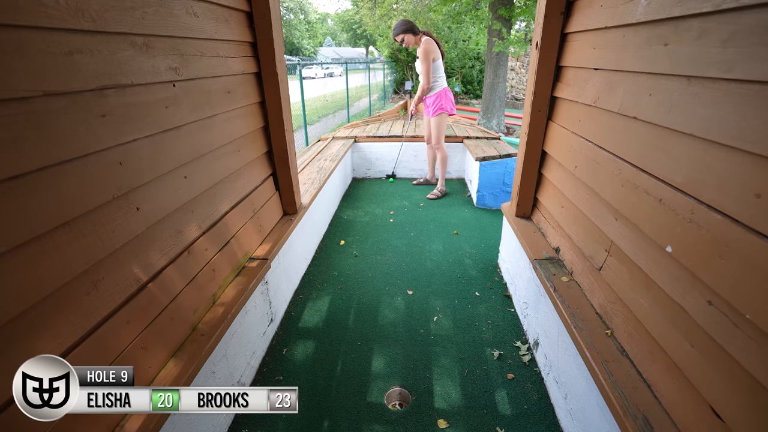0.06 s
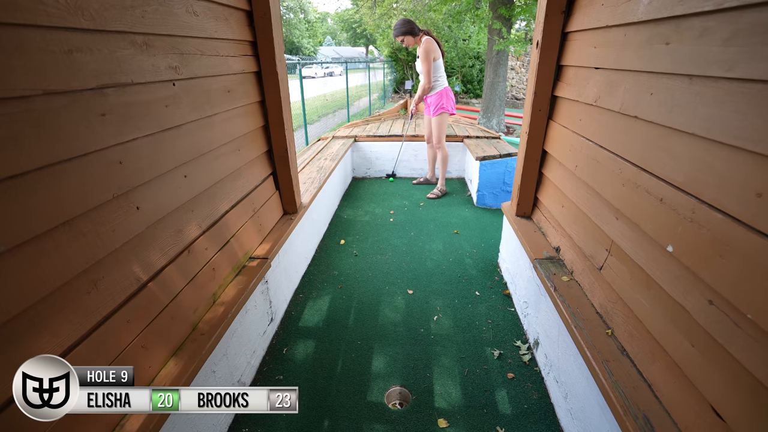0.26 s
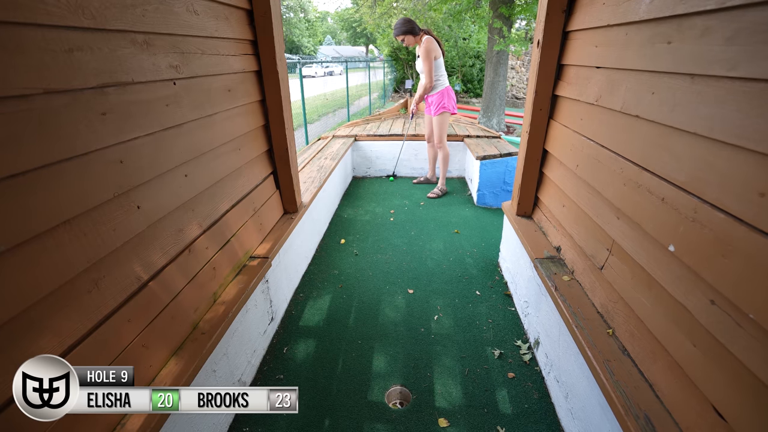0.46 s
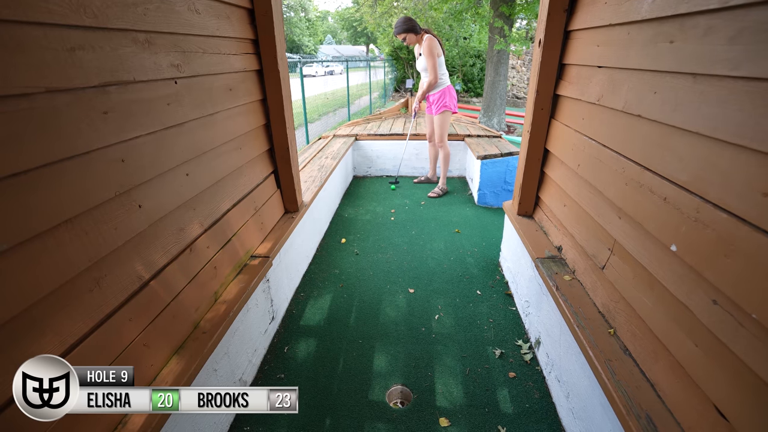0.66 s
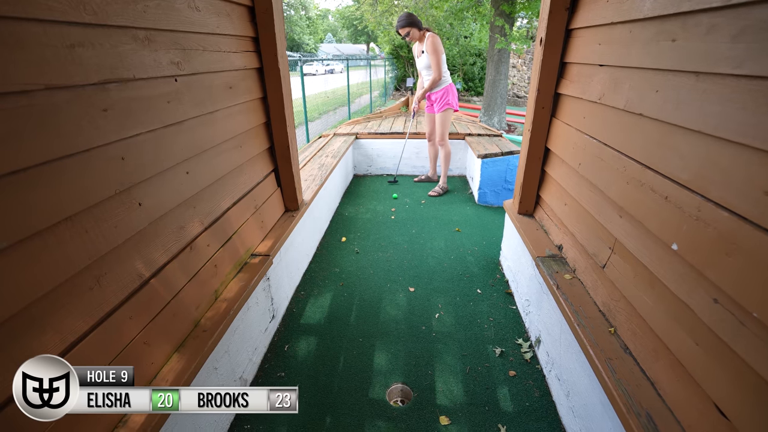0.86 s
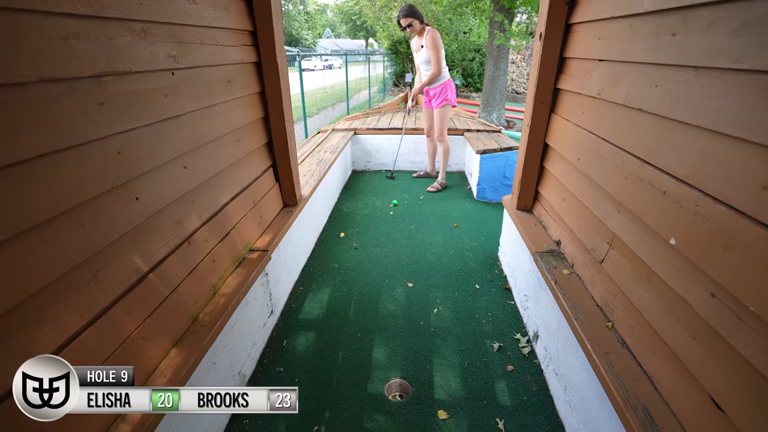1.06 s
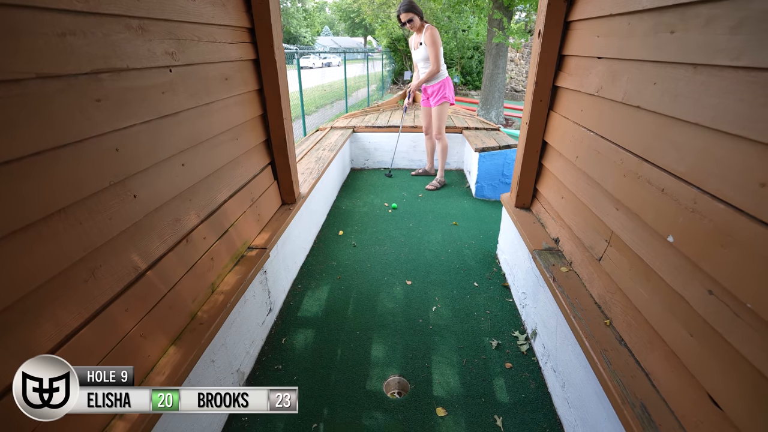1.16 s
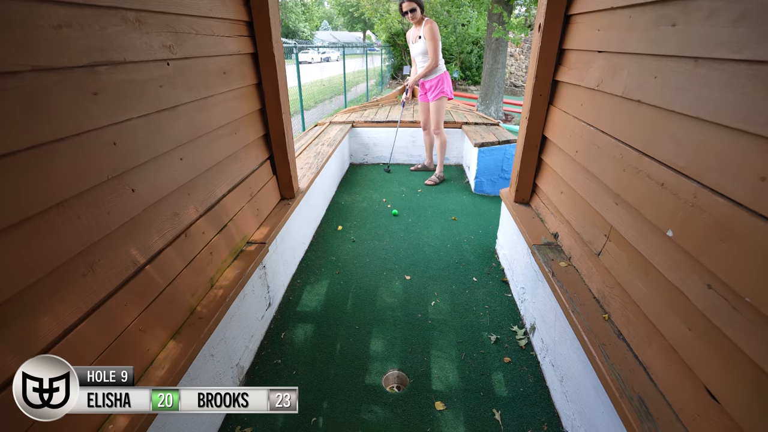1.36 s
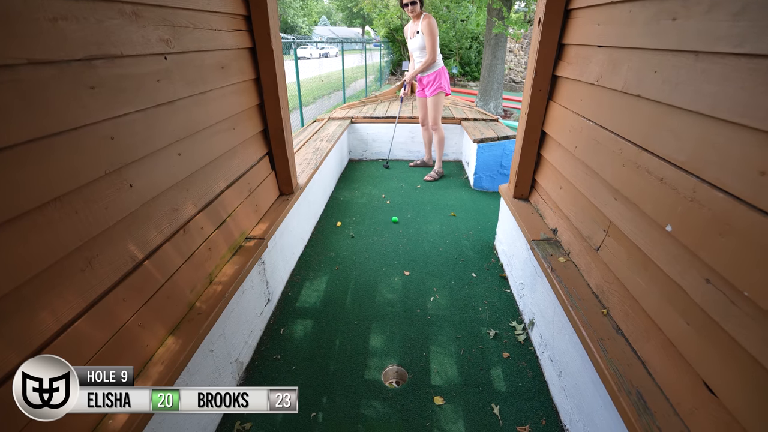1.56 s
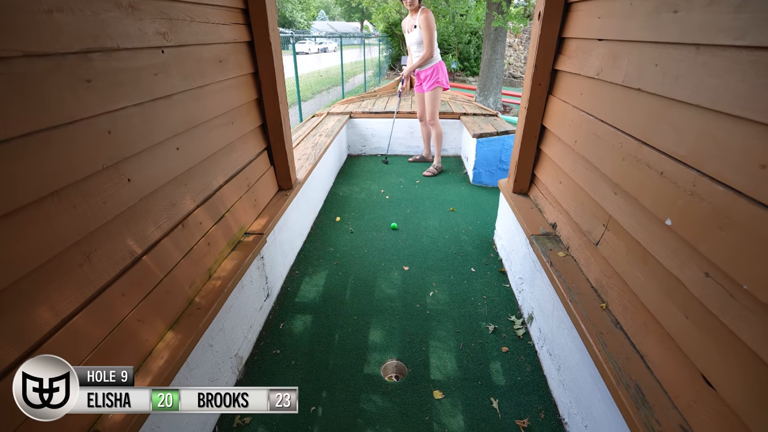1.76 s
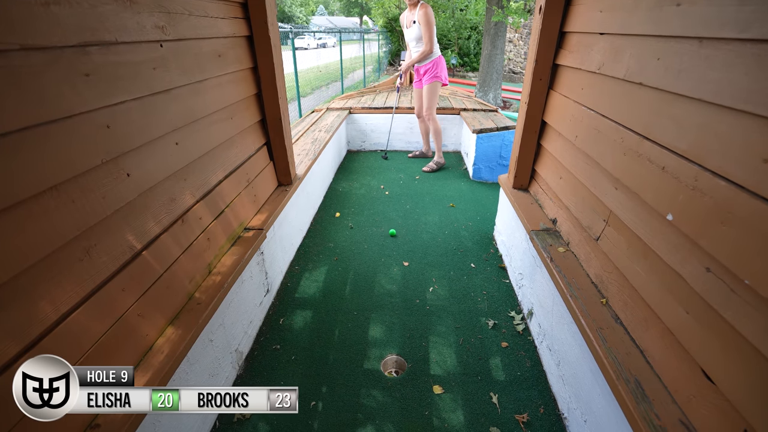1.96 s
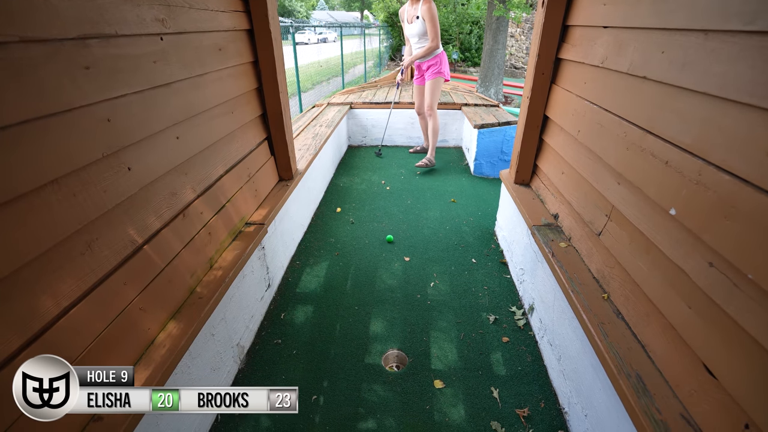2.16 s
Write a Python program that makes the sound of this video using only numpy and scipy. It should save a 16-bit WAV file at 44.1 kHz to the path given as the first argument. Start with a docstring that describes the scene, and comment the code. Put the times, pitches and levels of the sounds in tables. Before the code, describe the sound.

A putter hits a golf ball once with a sharp click that rings briefly in a wooden tunnel. Low puffs of wind buffet the microphone over a soft outdoor hush, and a distant bird whistles faintly.

```python
"""A putt in a mini golf tunnel

A putter taps a golf ball once, a few metres from a microphone inside a wooden mini golf tunnel.
The plank walls throw the click back and ring briefly. Puffs of wind buffet the microphone
over a steady outdoor hush, and a far bird gives a few thin, high whistles."""
import sys
import numpy as np
from scipy import signal
from scipy.fft import rfft, irfft
from scipy.io import wavfile
from scipy.ndimage import uniform_filter1d

SR = 44100
rng = np.random.default_rng(int(sys.argv[2]) if len(sys.argv) > 2 else 0)


def waveform_to_disk(signal):
    """Save audio, clipped to [-1, 1], as 16-bit WAV at the path in sys.argv[1]."""
    frames = np.transpose(np.atleast_2d(signal))
    scaled = np.clip(frames, -1, 1) * 32767
    samples = np.round(scaled).astype(np.int16)
    wavfile.write(sys.argv[1], SR, samples)


N = 97020
PUTT_S = 0.5719  # when the club meets the ball


def amp(db):
    """Turns decibels into a number to multiply a sound by."""
    return 10 ** (np.asarray(db) / 20)


def unit(x):
    """Scales a signal to an average size (rms) of one."""
    return x / np.sqrt(np.mean(x ** 2) + 1e-20)


def read(points, hz):
    """Reads between the rows of a table, giving each octave about the same room."""
    f, value = np.transpose(points)
    return np.interp(np.log(hz + 1), np.log(f + 1), value)


def add(mix, start_s, sound):
    """Mixes a sound in at a given time."""
    part = mix[max(round(start_s * SR), 0):][:len(sound)]
    part += sound[:len(part)]


def noise(gain):
    """Noise whose balance of low and high follows gain(frequency)."""
    return unit(irfft(rfft(rng.standard_normal(N)) * gain(np.fft.rfftfreq(N, 1 / SR)), N))


def fade(t, fade_s):
    """A vibration dying away: it drops by 60 dB in one fade time."""
    return np.exp(-np.log(1000) * t / fade_s)


def filtered(sound, kind, hz):
    """Keeps the part of a sound below one frequency (lowpass) or between two (bandpass)."""
    return signal.sosfilt(signal.butter(2, hz, kind, fs=SR, output="sos"), sound)


def ring(tones, rise_s):
    """A struck object rings with its own few tones, which build up quickly and die away."""
    t = np.arange(SR // 3) / SR
    onset = np.sin(np.pi / 2 * np.minimum(t / rise_s, 1)) ** 2
    return onset * sum(amp(db) * fade(t, fade_s) * np.sin(2 * np.pi * hz * t) for hz, db, fade_s in tones)


def hush(hiss_db=-60, rumble_db=-54.5, patch_db=0.96, swell_db=0.07):
    """Distant leaves and traffic: a soft hiss with drifting patches over a low rumble."""
    # tone of the hiss: (frequency [Hz], relative level [dB])
    hiss_shape = [(150, -2.5), (250, -0.5), (268, -4), (420, -4.5), (525, -6.5), (852, -4), (929, -6.5),
                  (1010, -4.5), (1200, -6.5), (1480, -7), (4000, -12.5), (5900, -15.5), (7800, -20.5),
                  (15500, -27.5)]
    # tone of the rumble: (frequency [Hz], relative level [dB])
    rumble_shape = [(10, 6), (30, -1), (58, 2), (85, -5), (130, -14), (200, -15.5), (300, -26), (600, -66),
                    (2000, -107)]
    hiss = noise(lambda f: amp(read(hiss_shape, f)))
    bands = signal.stft(hiss, nperseg=1024)[2]  # rows are frequencies, columns are moments
    patches = uniform_filter1d(rng.standard_normal(bands.shape), 14, axis=0)
    patches = unit(uniform_filter1d(patches, 14, axis=1))
    swell = unit(uniform_filter1d(rng.standard_normal(bands.shape[1]), 28))
    hiss = signal.istft(bands * amp(patch_db * patches + swell_db * swell), nperseg=1024)[1][:N]
    rumble = noise(lambda f: amp(read(rumble_shape, f)))
    return amp(hiss_db) * unit(hiss) + amp(rumble_db) * rumble


def bird(waver_hz=14, flutter_db=2.8, taper=2.1):
    """A far bird's thin, fluttering whistles swell and fade, each gliding up to a note that then drifts."""
    # (start [s], length [s], first pitch [Hz], held pitch [Hz], glide [s], drift [Hz/s], level [dB])
    whistles = [(0.484, 0.19, 4690, 4860, .08, -1300, -64), (0.489, 0.22, 5800, 6070, .095, 156, -61.5),
                (1.93, 0.37, 5780, 6040, 0.2, 898, -70.5)]
    out = np.zeros(N)
    for start, length, start_hz, held_hz, glide, drift, db in whistles:
        t = np.arange(0, length, 1 / SR)
        waver = unit(uniform_filter1d(rng.standard_normal(N), 300))
        hz = held_hz + (start_hz - held_hz) * np.cos(np.pi / 2 * np.minimum(t / glide, 1)) ** 2
        hz += drift * np.maximum(t - glide, 0) + waver_hz * waver[:len(t)]
        swell = abs(np.sin(np.pi * t / length)) ** taper
        level = amp(db + flutter_db * waver[-len(t):]) * swell
        add(out, start, level * np.sin(2 * np.pi * np.cumsum(hz) / SR))
    return out


def wind(steepness=8.8):
    """Swirling air hits the microphone in short, low puffs that swell and fall."""
    # puffs: (peak time [s], rise [s], fall [s], peak level [dB], upper edge of the sound [Hz])
    gusts = [(.17, 0.012, 0.037, -40, 29), (0.262, 0.019, 0.033, -33.5, 149.5),
             (0.294, 0.021, 0.038, -23, 60), (0.354, 0.041, 0.032, -38, 187),
             (0.389, 0.025, 0.026, -31, 76), (0.45, 0.022, 0.044, -41, 72.5),
             (0.551, 0.034, 0.037, -36, 35), (0.627, 0.018, 0.024, -31.5, 33.7),
             (.735, 0.053, 0.033, -40.5, 21), (0.836, 0.019, 0.02, -34.5, 25.5),
             (.917, 0.012, 0.015, -38.5, 88.5), (.955, 0.018, 0.022, -46, 59),
             (1.087, 0.026, 0.021, -40.5, 41), (1.145, 0.02, 0.05, -49, 118),
             (1.333, 0.016, 0.067, -46.5, 130), (1.378, 0.029, 0.019, -40.5, 53),
             (1.419, 0.014, 0.012, -33.5, 55), (1.46, 0.038, 0.025, -52, 128)]
    out = np.zeros(N)
    for peak, rise, fall, db, top_hz in gusts:
        t = np.arange(N) / SR - peak
        swell = np.exp(-(t / np.where(t < 0, rise, fall)) ** 2 / 2)
        low_hz = max(4, 0.19 * top_hz)
        swirl = noise(lambda f: f ** 2 / (f ** 2 + low_hz ** 2) / np.sqrt(1 + (f / top_hz) ** steepness))
        puff = swell * swirl
        out += amp(db) * puff * np.linalg.norm(swell) / np.linalg.norm(puff)
    return out


def tunnel(level_db=-47.5, delay_s=0.0055, rise_s=0.0038):
    """The putt bounces between the plank walls and blurs into a tail, each band fading at its own speed."""
    # tone of the tunnel's ring: (frequency [Hz], relative level [dB])
    tail_shape = [(100, 1.5), (280, -19), (450, -5.5), (750, 0.5), (1100, 1), (1500, -10), (2000, -13),
                  (2700, -23), (4000, -30.5), (5200, -15.5), (6000, -21), (7200, -31), (11000, -30),
                  (16000, -43)]
    # how long the tunnel rings: (frequency [Hz], fade time [s])
    fade_times = [(300, 0.2), (550, 0.12), (850, 0.17), (2000, 0.2), (5500, 0.16), (12000, .22)]
    hz, t, bands = signal.stft(noise(lambda f: amp(read(tail_shape, f))), SR, nperseg=256)
    bands *= fade(t, read(fade_times, hz)[:, None])
    tail = signal.istft(bands, SR, nperseg=256)[1][:SR // 2]
    tail *= np.minimum(np.arange(len(tail)) / SR / rise_s, 1)
    tail /= np.std(tail[:SR // 20])  # the first 50 ms set the level
    out = np.zeros(N)
    add(out, PUTT_S + delay_s, amp(level_db) * tail)
    return out


def putt(crack_band_hz=(6540, 12800), knock_band_hz=(430, 2080), echo_top_hz=2440):
    """Club meets ball with a sharp crack, a bright click and a hollow knock; nearby boards answer."""
    # hard contact of ball and club face: (pitch [Hz], relative level [dB], fade time [s])
    click_tones = [(5230, -37, 0.00093), (5300, -23.5, 0.0035)]
    # hollow knock of the club head: (pitch [Hz], level before filtering [dB], fade time [s])
    knock_tones = [(635, -40.5, 0.025), (1025, -24, 0.017), (1335, -22.5, 0.0081), (1540, -46.5, 0.031)]
    # short hollow note of the nearest planks: (pitch [Hz], relative level [dB], fade time [s])
    plank_tones = [(466, -47.5, 0.087), (569, -44, 0.067), (670, -40, 0.056)]
    # first echoes from kerbs and walls: (delay [s], level against the dulled hit [dB])
    echoes = [(.0022, -11), (.0031, -15), (.0068, -17), (.0094, -15), (0.0218, -23)]
    hit = ring(click_tones, rise_s=0.00049)
    t = np.arange(len(hit)) / SR
    crack = amp(-48.5) * fade(t, fade_s=0.032) * rng.standard_normal(len(t))
    add(crack, 0.0005, amp([-23.4]))  # a single spike gives the snap
    hit += filtered(crack, "bandpass", crack_band_hz)
    knock = ring(knock_tones, rise_s=0.00046)
    add(hit, 0.0003, filtered(knock, "bandpass", knock_band_hz))
    out = np.zeros(N)
    add(out, PUTT_S, hit)
    add(out, PUTT_S + 0.002, ring(plank_tones, rise_s=0.011))
    dull_hit = filtered(hit, "lowpass", echo_top_hz)
    for delay, db in echoes:
        add(out, PUTT_S + delay, amp(db) * dull_hit)
    return out


def scene():
    """All the sounds meet at one microphone."""
    return (putt() + tunnel() + hush() + bird() + wind())[None]


def record(dry):
    """The recorder cuts off the very highest treble."""
    top_hz = 15900
    lowpass = signal.firwin(255, top_hz, window=("kaiser", 9), fs=SR)
    return signal.oaconvolve(dry, lowpass[None], "same")


dry = scene()
out = record(dry)
waveform_to_disk(out)
```